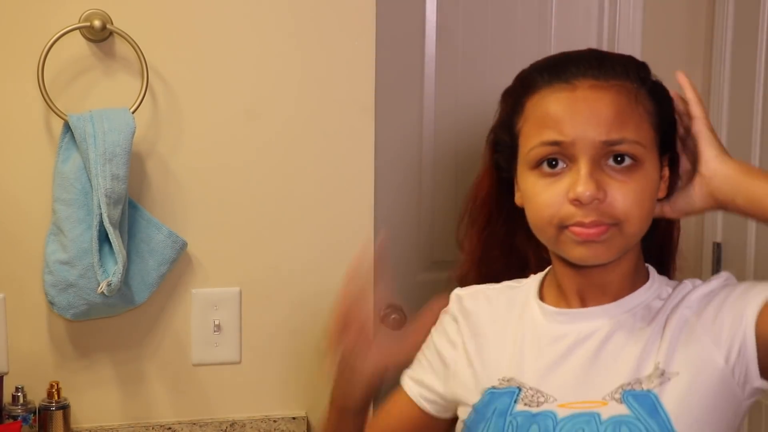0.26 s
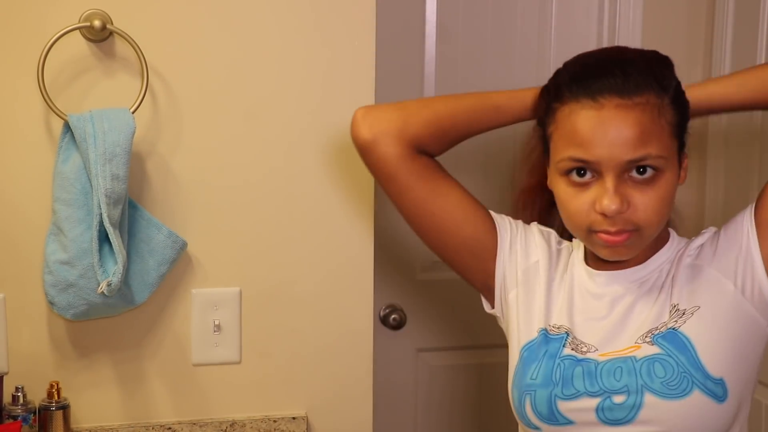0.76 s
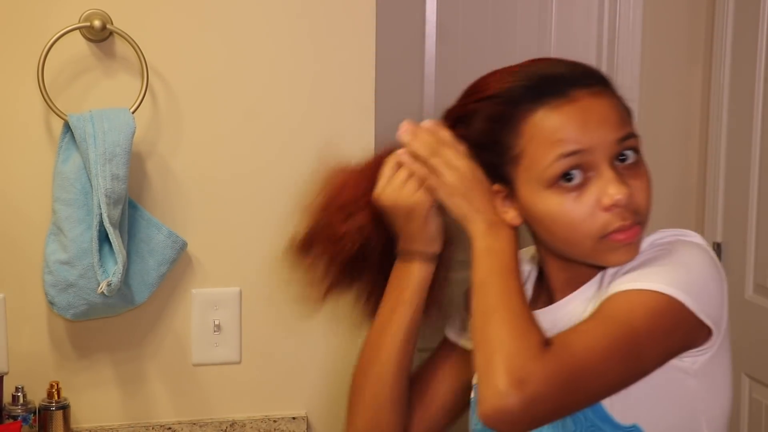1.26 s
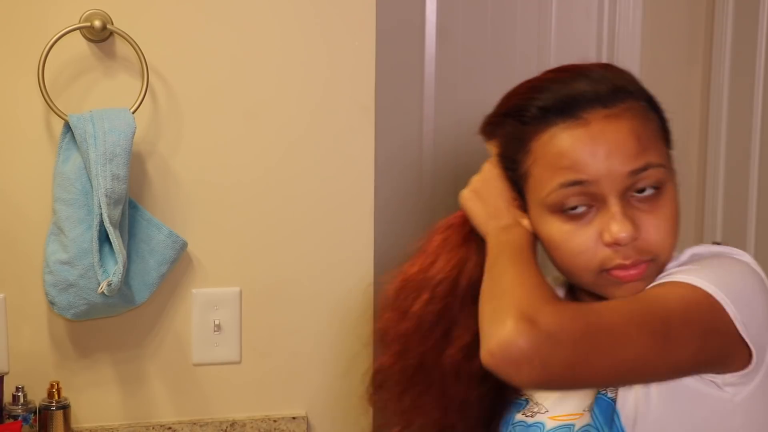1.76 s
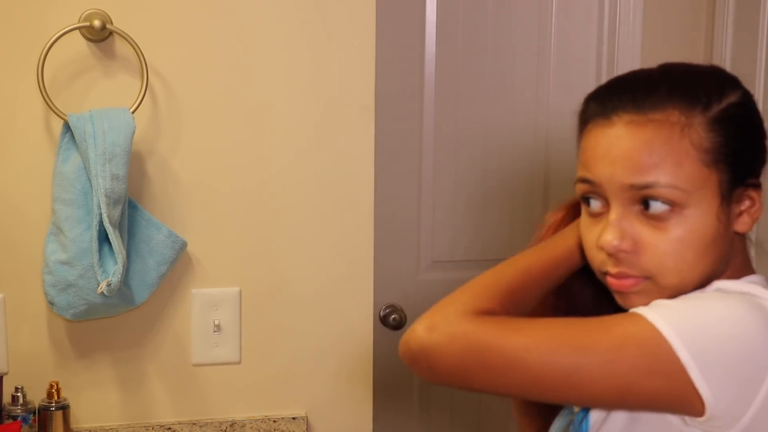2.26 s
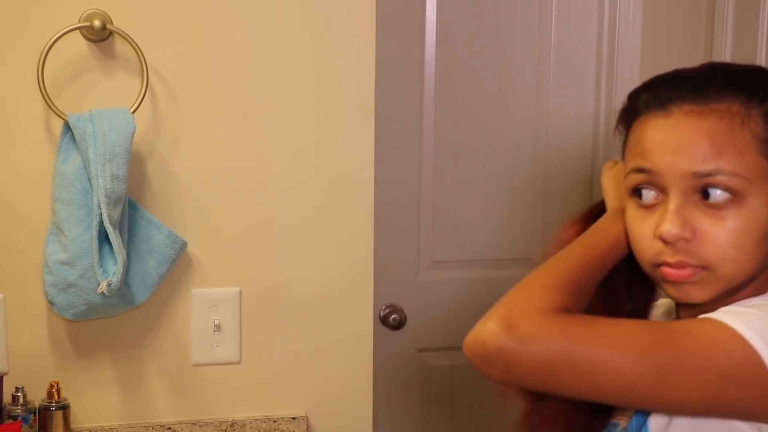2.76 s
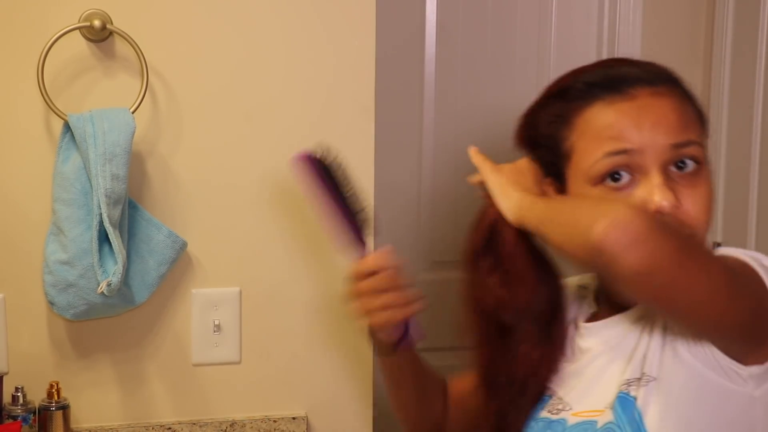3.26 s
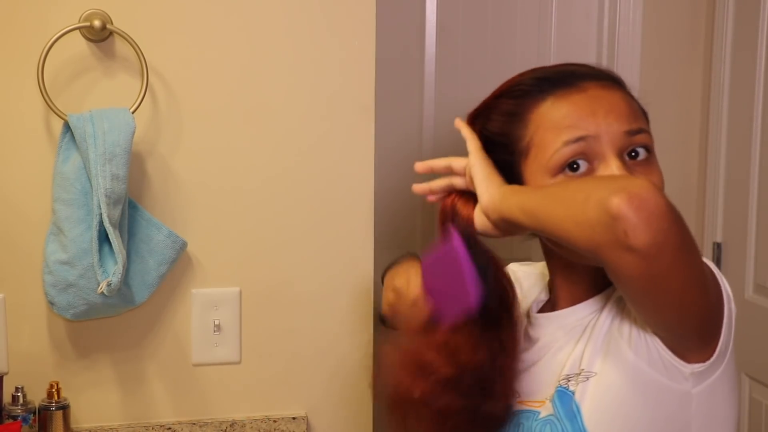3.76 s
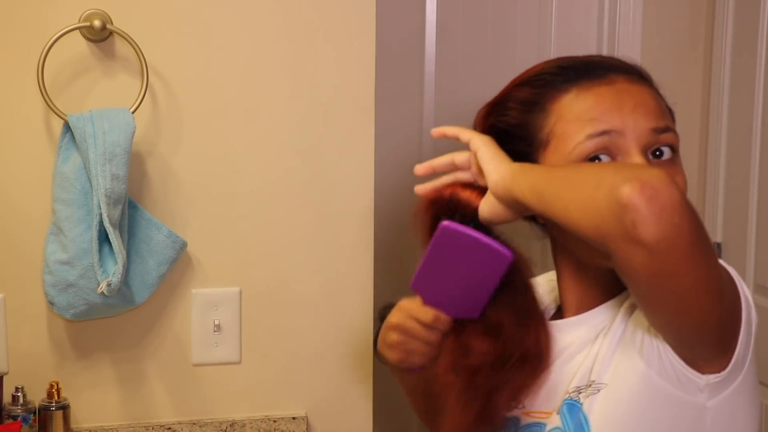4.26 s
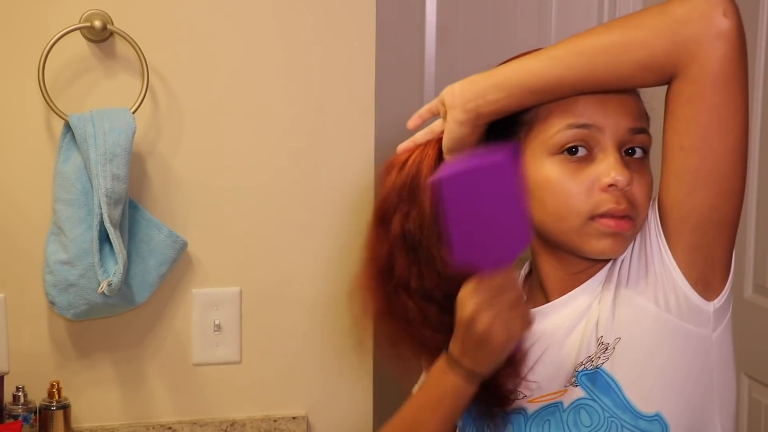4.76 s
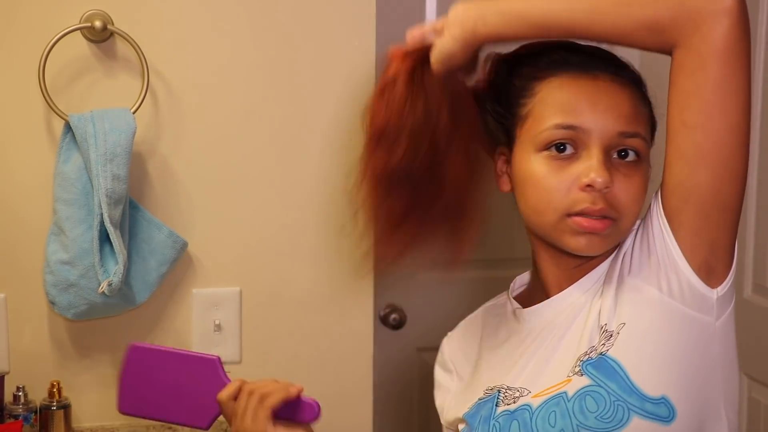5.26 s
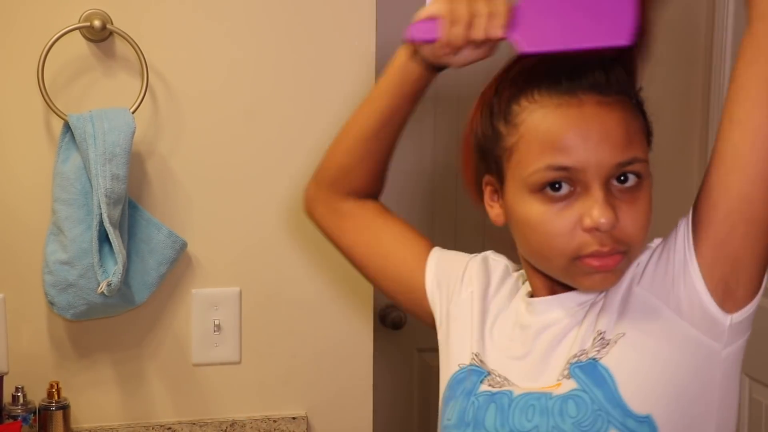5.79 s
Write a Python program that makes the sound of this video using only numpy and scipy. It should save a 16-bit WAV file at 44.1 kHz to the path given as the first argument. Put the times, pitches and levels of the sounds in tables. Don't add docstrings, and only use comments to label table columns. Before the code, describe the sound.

A burst of hard plastic knocks opens abruptly, echoing off bathroom tiles and dipping the background for a moment. Very quiet hair rustling follows, then scraping and a second sharp clack just before two seconds. Brisk, uneven brush pulls come in separate swishes, with small taps between them, and a soft hollow press near the end. Close microphone, quiet fan rumble and hiss.

```python
import sys
import numpy as np
from scipy import signal
from scipy.fft import rfft, irfft, next_fast_len
from scipy.io import wavfile
from scipy.ndimage import uniform_filter1d, map_coordinates

SR = 44100
rng = np.random.default_rng(int(sys.argv[2]) if len(sys.argv) > 2 else 0)


def digitize_waveform(pressure):
    field = np.atleast_2d(pressure).T
    bounded = np.clip(field, -1, 1)
    quanta = np.round(bounded * 32767).astype(np.int16)
    wavfile.write(sys.argv[1], SR, quanta)


def elevation(decibels):
    levels = np.asarray(decibels, float)
    return 10 ** (levels / 20)


N = 265910

# (f/Hz, density/dB)
FAN_LEVEL = [(0, -57), (1.5, -55.5), (1.999, -55.5), (3.0, -57.5), (4.1, -58), (5.2, -57.5), (5.65, -56),
             (6.03, -56.5)]
FAN_RUMBLE = [(15, -41), (25, -16), (114, -5), (140, -7), (160, -13.5), (330, -20), (361, -16.5),
              (657, -25.5), (900, -32.5), (1170, -59), (1980, -120)]
# (f/Hz, density/dB)
AIR_HISS = [(290, -20), (500, -10.5), (1180, -11.5), (1870, -8.5), (2540, -13.5), (3110, -11.5),
            (3650, -13), (7860, -15.5), (16000, -17.5)]
PORT_HISS = [(24, -31.5), (40, 6), (159, 0.5), (209, 3.5), (243, 1.5), (3220, 0.5), (10700, 1), (16000, -2)]

# (t/s, peak level/dB, thud against crack/dB, thud
# f/Hz, brightness/dB per octave)
KNOCKS = [(0.04, -2.5, -12, 335, -3), (0.078, -16, -7, 630, -5.5), (0.097, -19.5, -6, 650, -7.5),
          (0.15, -2, -10, 337, -3), (0.212, 3.5, -27, 710, 1), (0.951, -42, 6, 510, -4),
          (1.581, -24, -11.5, 677, -1), (1.682, -38.5, -16, 284.6, -7), (1.724, -33, -3, 622, -9.5),
          (1.769, -38, 4.5, 645, -11), (1.846, -22, -15, 710, -11), (1.871, -2, -14, 700, -3),
          (2.726, -25, -5, 660, -7), (2.952, -41.5, -14, 760, 0), (3.355, -29, -17, 490, 0),
          (3.781, -35.5, -4, 587, -13.5), (3.887, -29.5, -2.5, 756, 4.5), (4.274, -37.5, -11, 740, -2.5),
          (4.516, -23, -3, 956, -3.5), (4.757, -48.5, 7, 381, -3), (4.856, -41, -34, 250, -3),
          (4.903, -43.5, -13, 284, -8), (4.938, -40.5, 7.5, 411, -1.5)]
# (f/Hz, width/Hz, level/dB)
SHELL_MODES = [(304, 158, -5), (700, 330, -3), (1370, 140, -5.5), (2270, 790, -4.5), (3470, 460, 0),
               (4670, 1000, -4), (8460, 6000, -9), (10200, 3500, -7.5)]
# (lag/s, level/dB)
WALLS = [(.0035, -2.5), (.0062, -17), (0.0106, -6.5), (0.019, -15.5), (0.031, -8.5)]
# (f/Hz, t60/s)
TILE_DECAY = [(100, 0.39), (400, 0.43), (2000, 0.37), (6000, 0.34), (14000, 0.28)]
# (f/Hz, level/dB)
TILE_COLOUR = [(88, -48), (150, -49), (297, -6), (439, -6.5), (555, 0.5), (649, 8), (1600, -2), (2270, 0.5),
               (2450, -4.5), (4860, -9.5), (8900, -16.5), (13700, -27.5), (16000, -68)]
# (f/Hz, width/Hz, level/dB)
ROOM_MODES = [(284, 33, 7.5), (700, 37, -5), (940, 23, -3.5), (1910, 350, -3.5), (4220, 1300, 1)]

# (t/s, length/s, end level/dB, growth/dB, speed/dB)
RUSTLES = [
    (.5, 0.11, -60.5, 8, 2),
    (.62, 0.12, -57, 0, -5.5),
    (.75, 0.21, -57.5, -4, -3.5),
    (1.0, 0.14, -53, 1, -16),
    (1.185, 0.038, -61, -4, 5),
    (1.25, 0.14, -60.5, 2, 1),
    (1.36, 0.093, -54.5, 1.5, 0.5),
    (3.2, .1, -58.5, 10, -5.5),
    (5.24, .03, -66.5, -6, 4.5),
    (5.33, 0.14, -65.5, 8, 7),
]
# (t/s, length/s, end level/dB, growth/dB, speed/dB)
SCUFFS = [
    (.93, 0.053, -54.5, -5, 1),
    (1.57, 0.05, -51.5, -14, 9.5),
    (1.65, 0.025, -49, -4, 6.5),
    (1.7, 0.099, -45.5, -4, -4.5),
    (1.77, 0.027, -35.5, 9, -11),
    (1.836, 0.031, -30.5, -2.5, -21.5),
    (1.875, 0.096, -35.5, -5.5, -9),
    (1.915, 0.015, -45.5, -4.5, 16),
    (1.99, 0.023, -45.5, -7, 16),
    (4.525, 0.053, -56.5, 5, 3),
]
# (t/s, length/s, end level/dB, growth/dB, speed/dB)
STROKES = [(2.25, 0.17, -46.5, -2.5, 0.5), (2.315, 0.062, -35.5, 8.5, -2.5),
           (2.37, 0.094, -38.5, -1.5, -2.5), (2.625, 0.12, -34.5, 4.5, -1), (2.94, 0.2, -35.5, 8.5, -1.5),
           (3.342, .09, -45, -4, 5), (3.437, 0.037, -32.5, -5.5, -2.5), (3.73, .06, -42, 8, 3),
           (3.82, 0.09, -39, 2, -4), (3.872, 0.067, -39, 0, -1.5), (4.245, .03, -54.5, 0, 5.5),
           (4.262, 0.093, -44, -0.5, -2), (4.38, .12, -45, 9, 4), (4.895, 0.044, -43, 15, -0.5),
           (4.96, 0.21, -50.5, 2, -1.5), (5.86, 0.17, -50, 5, -1)]
# (t/s, length/s, end level/dB, growth/dB, speed/dB)
SWEEPS = [
    (5.635, .04, -52.5, -1.5, -8),
    (5.68, .065, -39, 15.5, -2),
    (5.75, 0.053, -39, -1.5, 3.5),
]
# (t/s, length/s, end level/dB, growth/dB, speed/dB)
LOOSE_ENDS = [
    (1.39, 0.046, -57, 4, 0),
    (2.38, 0.066, -56, 10, 0),
    (3.1, 0.041, -59, 3, 0.0031),
    (3.88, 0.068, -53.5, 2, 0),
    (4.34, 0.166, -59.5, 0, 0),
    (4.99, 0.21, -62, -3.5, 0),
    (5.88, .12, -64.5, -2, 0),
]
# (t/s, level/dB)
GRIP_SHIFTS = [(.532, -59), (.65, -48), (.98, -56), (1.45, -57), (1.6, -47), (1.81, -39), (1.888, -30.5),
               (3.0, -47.5), (3.16, -55), (3.468, -36), (3.93, -38), (4.219, -54.5), (4.49, -42.5),
               (4.749, -50), (4.829, -61), (5.091, -49.5), (5.43, -53), (5.94, -50)]

# (f/Hz, width/Hz, level/dB)
HANDLE_MODES = [(260, 59, -3), (288, 53, -1), (335, 33.6, -1)]
PAD_MODES = [(504, 67, 1), (606, 46.5, 3.5), (666, 102, 4), (784, 218, -1)]
SCRAPE_MODES = [(970, 424, -3), (1640, 910, 2), (2250, 3330, -2.5)]
BRISTLE_MODES = [(3850, 750, 0), (5200, 1200, -16)]
# (f/Hz, density/dB)
STRAND_HISS = [(2500, 7.5), (4800, 18), (6000, 10), (9000, 9), (11000, 7.5), (14000, 1.5), (15700, 0)]

# (pad/dB, scrape/dB, rasp/dB, hiss/dB, handle/dB)
SWEEP_MIX = (0.5, -0.5, -12, -33.5, -7.5)
ENDS_MIX = (-40, -30, -12, 0, -40)
SPEED_SHARE = (-0.39, 0.26, 1, 0.8, 0.25)
START_LEVEL = (-3.5, -0.5, -0.5, -2.5, -5.5)

# (t/s, level/dB, f/Hz)
BUMPS = [
    (.65, -45.5, 145),
    (1.581, -52, 110),
    (1.79, -49, 88),
    (1.97, -42, 98),
    (3.55, -56, 89),
    (5.648, -62.5, 123),
]


def unit(x):
    return x / np.sqrt(np.mean(x ** 2) + 1e-20)


def along(points, hz):
    f, v = np.transpose(points)
    return np.interp(np.log(hz + 1), np.log(f + 1), v)


def wobble(rate):
    knots = rng.standard_normal(int(N * rate / SR) + 4)
    return map_coordinates(knots, [np.arange(N) * rate / SR])


def filtered(x, response):
    m = next_fast_len(x.shape[-1] + 8192)
    spectrum = rfft(x, m) * response(np.fft.rfftfreq(m, 1 / SR))
    return irfft(spectrum, m)[..., :x.shape[-1]]


def resonances(modes, hz):
    total = 0
    for k, (centre, width, db) in enumerate(modes):
        damping = 1j * hz * width
        total = total + (-1) ** k * elevation(db) * damping / (centre * centre - hz * hz + damping)
    return total


def coloured(spectrum):
    return unit(filtered(rng.standard_normal(N), lambda hz: elevation(along(spectrum, hz))))


def tile_tail(seconds):
    hz, t, z = signal.stft(rng.standard_normal(int(seconds * SR)), SR, nperseg=256)
    decay = elevation(-60 * t / along(TILE_DECAY, hz)[:, None])
    tail = signal.istft(z * decay, SR, nperseg=256)[1]
    tail *= np.clip(np.arange(len(tail)) / SR / 0.0011, 0, 1)
    return tail / np.linalg.norm(tail)


def ducking(threshold_db, depth, recover_db):
    t, duck_db = np.arange(N) / SR, np.zeros(N)
    for s, db, *_ in KNOCKS:
        since = t - s - .004
        onset = np.clip(since / 0.00053, 0, 1)
        drop_db = depth * max(db - threshold_db, 0) * onset - recover_db * since
        duck_db = np.maximum(duck_db, drop_db * (since > 0))
    return elevation(-duck_db)


def background():
    sag = ducking(threshold_db=-5.5, depth=.9, recover_db=59.5)
    fan_db = np.interp(np.arange(N) / SR, *np.transpose(FAN_LEVEL)) + 3.0 + 1.19 * wobble(6.1)
    shared = sag * elevation(fan_db) * coloured(FAN_RUMBLE + [(1500, -101)])
    shared += elevation(-59.5) * elevation(.3 * wobble(5)) * coloured(AIR_HISS)
    side = elevation(-64.5) * coloured(PORT_HISS)
    return np.array([shared + side, shared - side])


def tilt(hz, db_per_octave):
    return elevation(db_per_octave * np.log2((hz + 300) / 2000))


def shell_crack(t, bright_db):
    contact = np.exp(-(t / .0018) ** 4) + .2 * elevation(-60 * t / .02)
    burst = rng.standard_normal(len(t)) * contact * (1 - np.exp(-t / .0003))
    crack = filtered(burst, lambda hz: resonances(SHELL_MODES, hz) * tilt(hz, bright_db))
    return crack / np.abs(crack).max()


def struck_tone(t, hz, t60_s, rise_s):
    return np.sin(2 * np.pi * hz * t) * elevation(-60 * t / t60_s) * (1 - np.exp(-t / rise_s))


def with_walls(hit):
    dull = filtered(hit, lambda hz: 1 / (1 + 1j * hz / 3000))
    return hit + sum(elevation(db) * np.roll(dull, round(lag * SR)) for lag, db in WALLS)


def tile_answer(thud, thud_db, bright_db):
    def colour(hz):
        brightness = tilt(hz, bright_db) / tilt(3100, bright_db)
        return elevation(along(TILE_COLOUR, hz)) * brightness * (0.84 + np.abs(resonances(ROOM_MODES, hz)))

    tail = tile_tail(.55)
    thud_echo = signal.fftconvolve(tail, thud)[:len(tail)]
    return elevation(19.5) * filtered(tail, colour) + elevation(thud_db + 9) * thud_echo


def knocks():
    counter_room_db, held_room_db, picked_up_s = 0, -8.5, .5
    out, t = np.zeros(N + SR), np.arange(SR // 10) / SR
    for s, db, thud_db, thud_hz, bright_db in KNOCKS:
        room_db = counter_room_db if s < picked_up_s else held_room_db
        room_db -= 0.16 * thud_db
        thud = struck_tone(t, thud_hz, t60_s=0.021, rise_s=0.0024)
        boom = struck_tone(t, 80, t60_s=0.31, rise_s=0.0025)
        hit = shell_crack(t, bright_db) + elevation(thud_db + 9.5) * thud + elevation(-25.0) * boom
        hit = with_walls(hit)
        echo = tile_answer(thud, thud_db, bright_db)
        graze_noise = uniform_filter1d(rng.standard_normal(SR // 160), size=9)
        graze = np.linspace(0, 1, SR // 160) * graze_noise

        start = round(s * SR)
        out[start - len(graze):start] += elevation(db - 21.0) * graze
        out[start:][:len(t)] += elevation(db + 0.5) * hit
        out[start + SR // 500:][:len(echo)] += elevation(db + room_db) * echo
    return out[:N]


def plucks(rate, spread_db):
    sizes = elevation(spread_db * np.clip(rng.standard_normal(N), -2, 2))
    return (rng.random(N) < rate / SR) * rng.standard_normal(N) * sizes


def plucked_body(impulses, modes, low_hz, high_hz):
    def body(hz):
        band = (1j * hz / (low_hz + 1j * hz) / (1 + 1j * hz / high_hz)) ** 2
        return resonances(modes, hz) * band

    return unit(filtered(impulses, body))


def gestures(rows, mix_db):
    land_db_per_s, lift_db_per_s = 1112, (245, 226, 255, 250, 233)
    hop = 32
    t, power = np.arange(0, N, hop) / SR, 0
    for s, length, db, growth_db, speed_db in rows:
        left = 1 - np.clip((t - s) / length, 0, 1)
        shared = db - growth_db * left - land_db_per_s * np.maximum(s + 0.017 - t, 0)
        lift = np.outer(lift_db_per_s, np.maximum(t - s - length, 0))
        own = np.outer(START_LEVEL, left) - lift
        layer_db = np.add(mix_db, speed_db * np.array(SPEED_SHARE))
        power = power + elevation(2 * (shared + own + layer_db[:, None]))
    return np.sqrt(np.repeat(power, hop, axis=1)[:, :N])


def grip_shifts(handle):
    t = np.arange(N) / SR
    for s, db in GRIP_SHIFTS:
        fade_db = np.maximum(378 * (s - t), 193 * (t - s))
        handle = np.maximum(handle, elevation(db - fade_db))
    return handle


def brushing():
    gains = gestures(STROKES, mix_db=(0, -5, -8.5, -9, -10.5))
    gains = gains + gestures(SCUFFS, mix_db=(-2, -1, -13.5, -13, 0.5))
    gains = gains + gestures(RUSTLES, mix_db=(-15.5, -1.5, -5.5, -4.5, -3))
    gains = gains + gestures(SWEEPS, SWEEP_MIX) + gestures(LOOSE_ENDS, ENDS_MIX)
    pad, shell, bristles, strands, handle = gains
    handle = grip_shifts(handle)

    thrum = plucked_body(plucks(rate=800, spread_db=2.5), HANDLE_MODES, 285, 610)
    drumming = plucked_body(plucks(rate=1500, spread_db=-1.5), PAD_MODES, 510, 1180)
    scrape = plucked_body(plucks(rate=5000, spread_db=0.5), SCRAPE_MODES, 830, 2600)
    release = plucks(rate=5900, spread_db=-2.5)
    rasp = plucked_body(release, BRISTLE_MODES, 2700, 5000)
    release_hiss = unit(filtered(release, lambda hz: elevation(along(STRAND_HISS, hz))))
    hiss = unit(coloured(STRAND_HISS) + 0.28 * release_hiss)

    snag = np.clip(wobble(45), -1.5, 1.2)
    near = pad * elevation(0.6 * snag) * drumming
    near += shell * elevation(1.15 * snag) * scrape
    near += handle * thrum
    near += bristles * elevation(1.3 * snag) * rasp
    near += strands * elevation(.7 * snag + wobble(25)) * hiss
    room = signal.fftconvolve(near, tile_tail(.6))[:N]
    return elevation(-0.5) * near + elevation(-11.5) * room


def bumps():
    t, swells = np.arange(N) / SR, 0
    for s, db, hz in BUMPS:
        swell = np.exp(-((t - s) / 0.026) ** 2)
        swells = swells + elevation(db) * swell * np.sin(2 * np.pi * hz * (t - s))
    return elevation(2.1 * wobble(30.2)) * swells


def scene():
    return background() + knocks() + brushing() + bumps()


def low_pass(x):
    return signal.sosfilt(signal.butter(12, 16650, fs=SR, output="sos"), x)


def record(dry):
    x = dry * ducking(threshold_db=-10.0, depth=0.8, recover_db=133)
    x = x / (1 + np.abs(x / .87) ** 6) ** (1 / 6)
    x = filtered(x, lambda hz: np.where(hz < 15750, 1, elevation(-30.5)))
    return low_pass(x)


dry = scene()
out = record(dry)
digitize_waveform(out)
```